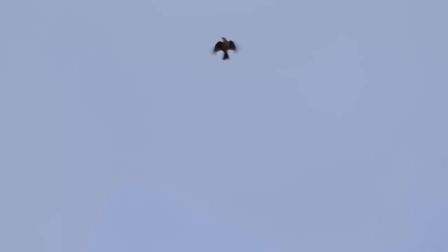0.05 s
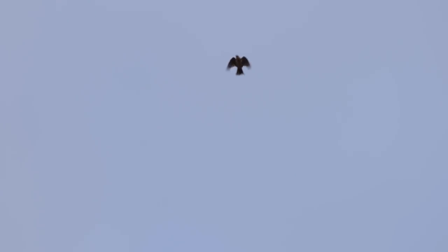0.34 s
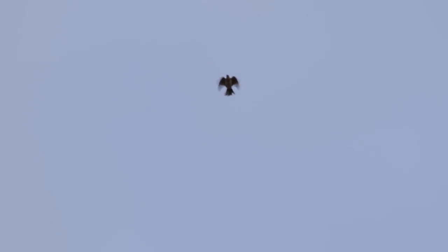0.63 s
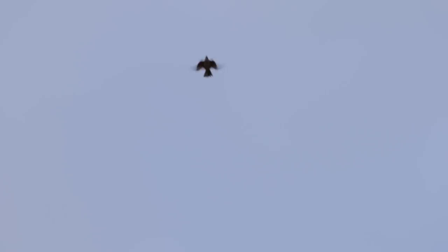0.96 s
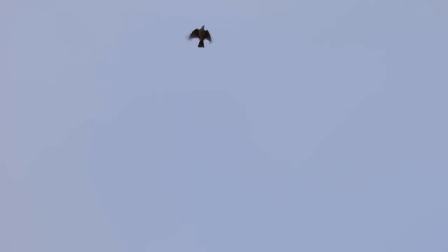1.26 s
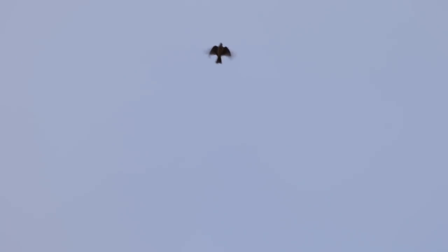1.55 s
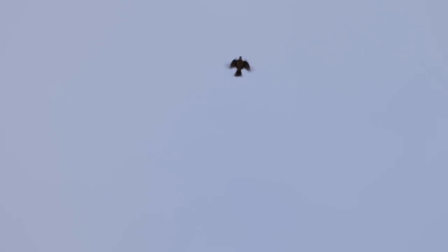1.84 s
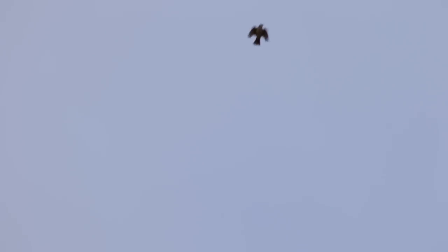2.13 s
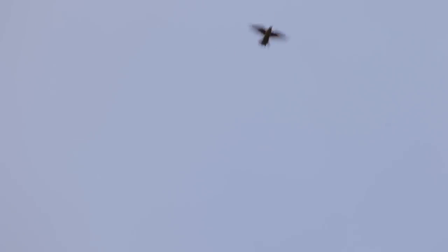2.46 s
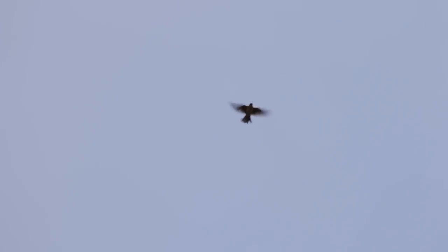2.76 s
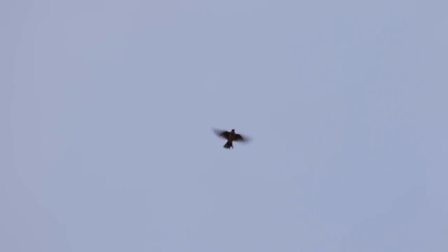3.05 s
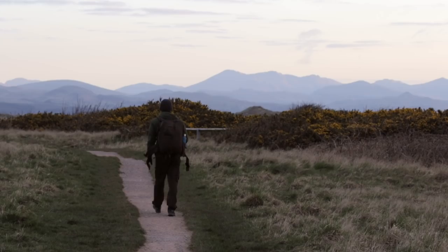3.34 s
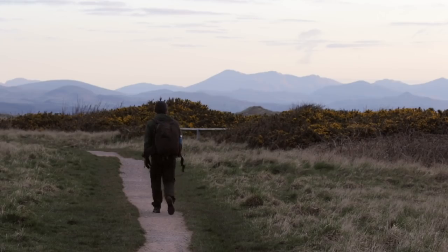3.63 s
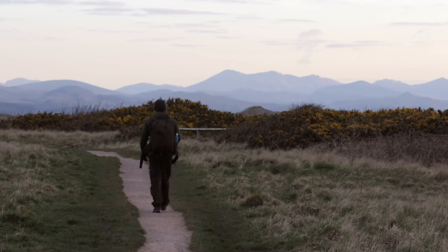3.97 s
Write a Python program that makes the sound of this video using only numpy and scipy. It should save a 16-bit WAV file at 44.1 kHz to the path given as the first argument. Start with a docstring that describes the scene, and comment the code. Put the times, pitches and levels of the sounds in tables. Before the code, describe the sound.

A small bird sings rapid chirps, trills and warbles over a low wind rumble.

```python
"""A small bird sings in flight near the microphone, over open grassland: one pure whistle, bent into a rattle,
chips, rising warbles, buzzes and pips. Farther off a second bird answers faintly, blurred by scatter from the
bushes. Wind rumbles on the microphone over a low distant roar and a thin wide hiss. Near 3.41 s the near song
falls silent; at 3.42 s the background drops, and two faint scuffs follow."""
import sys
import numpy as np
from scipy import signal
from scipy.fft import rfft, irfft, next_fast_len
from scipy.io import wavfile
from scipy.ndimage import uniform_filter1d, map_coordinates

SR = 44100
rng = np.random.default_rng(int(sys.argv[2]) if len(sys.argv) > 2 else 0)


def to_wav(s):
    """Save 16-bit WAV."""
    ch = np.atleast_2d(s).T  # columns
    pcm = np.round(np.clip(ch, -1, 1) * 32767)  # PCM
    wavfile.write(sys.argv[1], SR, pcm.astype(np.int16))


N = 176400
TIME = np.arange(N) / SR


def amp(db):
    """Decibels to gain."""
    return 10 ** (np.asarray(db) / 20)


def unit(x):
    """Scale to rms 1."""
    return x / np.sqrt(np.mean(x ** 2) + 1e-20)


def curves(rows, at):
    """Each column after the first, read at the given places."""
    knots, *columns = np.transpose(rows)
    return [np.interp(at, knots, column) for column in columns]


def wobble(rate, size):
    """A smooth random curve, rate knots a second."""
    knots = rng.standard_normal(int(size * rate / SR) + 4)
    return map_coordinates(knots, [np.arange(size) * rate / SR])


def coloured(x, points):
    """Filter x by a curve of (f/Hz, level/dB) points."""
    size = next_fast_len(N + 8192)
    hz, db = np.transpose(points)
    gain = amp(np.interp(np.log(np.fft.rfftfreq(size, 1 / SR) + 1), np.log(hz + 1), db))
    return irfft(rfft(x, size) * gain, size)[:N]


def noise(points):
    """Coloured noise of rms 1."""
    return unit(coloured(rng.standard_normal(N), points))


def add(out, start, sound):
    """Mix a sound in at start seconds."""
    part = out[max(0, round(start * SR)):][:len(sound)]
    part += sound[:len(part)]


def wind(lumps_db=1):
    """Gusts buffet the microphone with a lumpy rumble."""
    # Strength of the gusts (t/s, level/dB)
    gusts = [(0, -40), (.3, -49), (1.05, -42.5), (1.13, -37), (1.25, -42.5), (1.56, -38), (1.6, -35),
             (1.68, -43), (1.76, -32.5), (1.88, -38.5), (2.15, -41), (2.75, -46.5), (3.35, -50), (3.5, -60),
             (4, -63)]
    # Spectrum of the buffeting (f/Hz, level/dB)
    colour = [(10, -8), (28, -1), (45, -6), (75, -9), (120, -16), (200, -23.5), (500, -31.5), (1500, -120)]
    rumble = noise(colour) * amp(lumps_db * wobble(17, size=N))
    return amp(curves(gusts, TIME)[0]) * unit(rumble)


def distant_roar(waver_db=0.63):
    """A low, wavering roar far off, with a narrow drone near 300 Hz swelling in it."""
    # Loudness of the roar and of the drone (t/s, level/dB)
    roar_level = [(0, -44), (3.35, -45), (3.5, -47), (4, -47.5)]
    drone_level = [(0, -50.5), (1, -48.5), (2.1, -48), (2.5, -54.5), (3.1, -45.5), (3.5, -57), (4, -50)]
    # Their spectra (f/Hz, level/dB)
    roar_colour = [(20, -41), (100, -13), (200, -6.5), (255, -4), (335, -4.5), (450, -5.5), (600, -9.5),
                   (900, -11), (1200, -16.5), (1600, -23.5), (2300, -34), (4000, -30.5), (8000, -40)]
    drone_colour = [(150, -40), (265, -12), (296, -3), (325, -14), (550, -55)]
    roar = amp(curves(roar_level, TIME)[0] + waver_db * wobble(11.27, size=N)) * noise(roar_colour)
    drone = amp(curves(drone_level, TIME)[0]) * noise(drone_colour)
    return roar + drone


def hiss(mid_db=-57, drop_at_s=3.425, drop_db=-3.5):
    """Thin microphone hiss, wide in the treble; it steps down at 3.42 s."""
    # Spectrum of the hiss (f/Hz, level/dB)
    colour = [(100, -35), (2000, 7.5), (5000, 2), (9000, 0.5), (15500, 0)]
    # Stereo width (f/Hz, side over mid/dB)
    width = [(100, -15), (4500, -13.5), (6200, -1), (15000, -0.5)]
    mid, side = noise(colour), coloured(noise(colour), width)
    return np.array([mid + side, mid - side]) * amp(mid_db + drop_db * (TIME > drop_at_s))


def whistle(hz, db, edge_s, flutter_db=0.6, jitter=.003):
    """A bird's voice: a slightly unsteady sine with a faint octave."""
    # Strength of the octave against the fundamental (f/Hz of the octave, level/dB)
    overtone = [(7600, -35), (8500, -29), (9400, -36)]
    n = len(hz)
    t = np.arange(n) / SR
    unsteady_hz = hz * (1 + jitter * wobble(493, size=n))
    phase = 2 * np.pi * np.cumsum(unsteady_hz) / SR
    gate = np.sin(np.pi / 2 * np.clip(np.minimum(t, t[::-1]) / edge_s, 0, 1))
    octave = amp(curves(overtone, 2 * hz)[0]) * np.sin(2 * phase)
    level = amp(db + flutter_db * wobble(274, size=n))
    return np.sqrt(2) * gate * level * (np.sin(phase) + octave)


def notes(rows, shape):
    """Short whistled notes that share one shape of pitch and loudness."""
    out = np.zeros(N)
    for start, length, hz, bend_hz, db in rows:
        offset, swell_db = curves(shape, np.linspace(0, 1, max(int(length * SR), 16)))
        pitch = hz + bend_hz * uniform_filter1d(offset, size=40)
        add(out, start, whistle(pitch, db + swell_db, edge_s=0.00017))
    return out


def grassland(song, scatter_db, linger_db=-22, ground_db=-21.5):
    """Song reaches the microphone with scatter from the bushes, a faint tail and a ground bounce."""
    scatter_delay_s, ground_delay_s = 0.0052, 0.0092
    t = np.arange(SR // 2) / SR

    def scatter(t60_s):
        tail = rng.standard_normal(len(t)) * amp(-60 * t / t60_s) * (t > scatter_delay_s)
        return signal.fftconvolve(song, tail / np.linalg.norm(tail))[:N]

    out = song + amp(scatter_db) * scatter(t60_s=0.1) + amp(linger_db) * scatter(t60_s=0.21)
    add(out, ground_delay_s, amp(ground_db) * song)
    return out


def near_bird(arch_s=.0071):
    """The singer close by, nearly dry: runs of short bent notes around its warbles and buzzes."""
    # Course of each kind of note (share of its length, pitch offset/bends, level/dB)
    arch_shape = [(0, -1.15, -28), (.3, -0.15, 0.5), (.5, -0.0054, -2), (.7, -0.35, -1.5), (1, -0.78, -21)]
    slur_shape = [(0, -0.82, -17), (.1, -0.99, 0), (.3, -.55, 0), (.5, 0.094, -1), (.88, -0.011, 1.5),
                  (1, 0.12, -20)]
    chip_shape = [(0, -1.6, -22), (.06, -1, -12), (.1, .1, -1.5), (.15, .5, -2), (.205, .75, -20),
                  (.235, 1.25, -20), (.28, .75, -7), (.34, .35, -2.5), (.48, .04, -1.3), (.66, 0, 0),
                  (.86, .13, 0), (.905, -.45, 1), (.94, -1.2, -9), (1, -1.8, -17)]
    rise_shape = [(0, -2, -30), (.22, -0.52, 0.5), (.5, 0, 1.5), (.75, 0.03, -7), (1, 1, -37)]
    fall_shape = [(0, 0, -16), (.2, 0, 0), (.45, -.1, 0), (.7, -.5, 0), (.88, -.85, -3), (1, -1, -16)]
    pip_shape = [(0, 0, -15), (.22, -0.13, 1), (.7, -.6, -2), (1, -1.03, -15)]
    # The opening rattle, arches of one length (t/s, f/Hz, bend/Hz, level/dB)
    arches = [(.0056, 3689, 2122, -32.6), (.0173, 3863, 2093, -31.5), (.0294, 3991, 1900, -31),
              (.0412, 4117, 2061, -31.7), (.0529, 4252, 2300, -31.6), (.0646, 4231, 2300, -31.2),
              (.0762, 4364, 2400, -31.5), (.0875, 4394, 2400, -31.7), (.0992, 4401, 2400, -32.6),
              (.1108, 4498, 2600, -34.8)]
    # The other short notes (t/s, length/s, f/Hz, bend/Hz, level/dB)
    slurs = [(0.1778, 0.033, 4330, 960, -35), (0.2104, 0.037, 4136, 835, -36),
             (0.2458, 0.034, 4075, 790, -36.5)]
    chips = [(0.3962, 0.0403, 3616, 847, -33.9), (0.4655, 0.0411, 3817, 807, -32.0),
             (0.5366, 0.0399, 3979, 995, -32.1), (0.6101, 0.0399, 4046, 1145, -31.9),
             (0.6826, 0.0391, 4097, 1152, -30.7), (0.7567, 0.0408, 4124, 1046, -31.8),
             (0.8319, 0.0411, 4157, 1019, -31.9), (0.9092, 0.0409, 4215, 1048, -31.7),
             (0.9858, 0.0401, 4103, 1063, -34.9)]
    rises = [(.1524, .028, 4920, 400, -36), (0.2825, 0.008, 3600, 500, -42.0),
             (.3365, .005, 4050, 700, -39), (2.5961, 0.0086, 3825, 569, -37.0),
             (2.62, 0.0084, 3829, 687, -33.7), (2.644, 0.0082, 3796, 604, -31.6),
             (2.6679, 0.0084, 3840, 585, -31.8), (2.6909, 0.0079, 3885, 798, -32.7),
             (3.3296, 0.0116, 4503, 266, -33.3), (3.3425, 0.0115, 4463, 674, -35.4),
             (3.3574, 0.0095, 4303, 799, -33.6), (3.3725, 0.0091, 4161, 865, -33.4),
             (3.3879, 0.0086, 4064, 760, -32.6), (3.4035, 0.0083, 4062, 894, -32.9)]
    falls = [(.342, .025, 3380, 800, -35), (2.8025, .009, 4680, 1150, -37),
             (2.8165, .0095, 4700, 1300, -38), (2.8305, .0105, 4750, 1500, -38),
             (2.845, .0105, 4700, 1500, -38), (2.8595, .0105, 4700, 1550, -37),
             (2.874, .0108, 4700, 1600, -37), (2.8888, .0105, 4650, 1600, -38),
             (3.2812, .0045, 4460, 1600, -35.5), (3.3003, .0055, 4150, 1100, -32.5),
             (3.3167, .0081, 3983, 354, -30.1)]
    pips = [(2.6115, 0.0075, 2650, -200, -44.5), (2.6345, 0.0081, 2650, -200, -42.4),
            (2.657, 0.0102, 2650, -200, -43.7), (2.6816, 0.0082, 2650, -200, -42.4),
            (2.7349, 0.0348, 5195, 618, -40.0), (2.7685, 0.0128, 5094, 280, -41.7),
            (2.7881, 0.0088, 4830, 186, -38.6), (2.9414, 0.0083, 5083, 60, -41.7),
            (2.9601, 0.0112, 5168, 367, -38.7), (2.9816, 0.0103, 5097, 239, -39.1),
            (3.0018, 0.0116, 5097, 204, -39.2), (3.0232, 0.0069, 5137, 468, -44.3),
            (3.1383, 0.0294, 4432, 601, -36.9), (3.1671, 0.0045, 3405, 323, -37.0),
            (3.1801, 0.0047, 3128, 84, -37.8), (3.1929, 0.0042, 3022, 1, -39.7),
            (3.2055, 0.0042, 3033, 0, -37.5), (3.2178, 0.0048, 3065, 40, -36.7),
            (3.2301, 0.0049, 2997, 0, -37.4)]
    rattle = [(start, arch_s, *rest) for start, *rest in arches]
    kinds = [(rattle, arch_shape), (slurs, slur_shape), (chips, chip_shape),
             (rises, rise_shape), (falls, fall_shape), (pips, pip_shape)]
    song = sum(notes(rows, shape) for rows, shape in kinds) + warbles() + buzzes()
    return grassland(song, scatter_db=-20)


def far_bird():
    """Faint whistled glides from farther off, blurred by scatter."""
    # The answering notes (t/s, length/s, f/Hz, bend/Hz, level/dB)
    glides = [(.3, 0.019, 3800, 500, -60), (.376, 0.028, 3430, 500, -68), (2.04, 0.014, 4000, 518, -62),
              (2.23, 0.09, 4620, -150, -64), (2.245, .04, 2740, -150, -65), (2.36, 0.021, 3670, 652, -55),
              (2.432, 0.023, 4950, 396, -54.5), (2.57, 0.084, 4850, -300, -62),
              (2.67, 0.14, 4500, -250, -64), (2.703, 0.035, 2685, -650, -61),
              (2.914, 0.037, 4420, 1200, -55.5), (3.555, 0.014, 3770, 350, -66),
              (3.768, 0.024, 5020, 495, -63.5), (3.835, 0.013, 5000, 250, -62),
              (3.862, 0.018, 3750, 400, -64), (3.926, 0.027, 4030, 854, -65),
              (3.938, 0.014, 4950, 150, -61.5)]
    # Course of a glide (share of its length, pitch offset/bends, level/dB)
    glide_shape = [(0, -1.046, 0), (.5, -.4, 3), (1, -0.068, -7)]
    return grassland(notes(glides, glide_shape), scatter_db=-5)


def glide(values, progress):
    """A smooth curve through evenly spaced values, read at progress 0 to 1."""
    knots = np.linspace(0, 1, len(values))
    return np.polyval(np.polyfit(knots, values, len(values) - 1), progress)


def warbles():
    """Upward slides: a raspy start opens into fast vibrato, louder at the throat's resonance."""
    # Slides (t/s, length/s, f/Hz at start, 1/3, 2/3 and end, level/dB at start, middle and end)
    slides = [(1.067, 0.16, 2670, 3100, 3760, 4360, -41, -36.7, -36.5),
              (1.276, 0.152, 2830, 3070, 3700, 4410, -34.8, -32.1, -32.3),
              (1.482, 0.152, 2880, 3120, 3830, 4390, -35.5, -32.6, -34.9),
              (1.688, 0.16, 2780, 3360, 4320, 5260, -38.2, -34.5, -39.7),
              (1.897, 0.142, 3240, 3850, 4990, 5350, -40, -36.8, -40.7),
              (2.081, 0.15, 3310, 3960, 5200, 5300, -41.9, -34.4, -40.6),
              (2.279, 0.143, 3050, 3880, 4900, 5340, -40.9, -38.2, -44.6)]
    # Resonance of the throat (f/Hz, level/dB)
    throat = [(2400, -9.5), (2900, -3.5), (3500, 0), (4600, 0), (5200, -2), (5800, -9)]
    vibrato_hz, vibrato_depth, vibrato_onset_s = 85, .063, 0.02
    rasp_hz, rasp_depth, rasp_fade_s = 301, 0.35, 0.037
    out = np.zeros(N)
    for start, length, *course in slides:
        pitches, levels = course[:4], course[4:]
        t = np.arange(int(length * SR)) / SR
        vibrato = np.cos(2 * np.pi * vibrato_hz * t) * np.minimum(t / vibrato_onset_s, 1)
        rasp = rasp_depth * np.exp(-(t / rasp_fade_s) ** 2) * np.sin(2 * np.pi * rasp_hz * t)
        hz = glide(pitches, t / length) * (1 + vibrato_depth * vibrato)
        db = glide(levels, t / length) + curves(throat, hz)[0]
        add(out, start, (1 + rasp) * whistle(hz, db, edge_s=0.0063))
    return out


def thumps():
    """Single eddies hit the microphone: a quick suck and push."""
    # Eddies in the gusts (t/s, half width/s, level/dB)
    eddies = [(1.11, .005, -31), (1.596, .004, -23)]
    out = np.zeros(N)
    for centre, half_width, db in eddies:
        passage = (TIME - centre) / half_width
        out += amp(db) * passage * np.exp(-passage ** 2 / 2)
    return out


def buzzes(pulse_hz=143, shake_hz=256):
    """The near bird's fast pulses run together into a shaking tone."""
    # Two buzzes, a list of points for each (t/s, f/Hz, level/dB, pulsing depth/dB)
    courses = [
        [(2.474, 4550, -37, 18), (2.492, 3710, -38.5, 26), (2.505, 4100, -37.5, 13), (2.52, 4660, -38, 7),
         (2.552, 4540, -33.5, 7), (2.561, 4630, -46, 5)],
        [(3.065, 4520, -41, 12), (3.076, 4437, -36.5, 13), (3.1, 4500, -37, 4), (3.122, 4534, -38, 8),
         (3.137, 4320, -43, 6)],
    ]
    out = np.zeros(N)
    for rows in courses:
        t = np.arange(rows[0][0], rows[-1][0], 1 / SR)
        hz, db, pulsing_db = curves(rows, t)
        gap = np.cos(np.pi * pulse_hz * (t - t[0])) ** 4  # pitch and level dip between pulses
        pitch = hz + shake_hz * (.5 - 2 * gap)
        add(out, t[0], whistle(pitch, db - pulsing_db * gap, edge_s=0.00315))
    return out


def gritty_puffs():
    """Brief puffs of gritty noise: the rasp in the near bird's first buzz, then two faint scuffs."""
    # The buzz's rasp and the two scuffs (t/s, length/s, level/dB)
    puffs = [(2.485, 0.026, -51), (3.716, 0.029, -55.5), (3.74, .015, -58)]
    # Spectrum of the grit (f/Hz, level/dB)
    colour = [(600, -27), (1800, 2), (4000, -7), (8000, -25)]
    envelope = np.zeros(N)
    for start, length, db in puffs:
        add(envelope, start, amp(db) * np.hanning(int(length * SR)))
    return envelope * noise(colour)


def scene():
    """Birds, wind, roar and gritty puffs in the centre, hiss around them."""
    return near_bird() + far_bird() + wind() + distant_roar() + thumps() + gritty_puffs() + hiss()


def record(dry):
    """The recorder keeps nothing above its band limit."""
    top_hz = 15800
    size = next_fast_len(N + 8192)
    passband = np.fft.rfftfreq(size, 1 / SR) < top_hz
    return irfft(rfft(dry, size) * passband, size)[:, :N]


dry = scene()
out = record(dry)
to_wav(out)
```